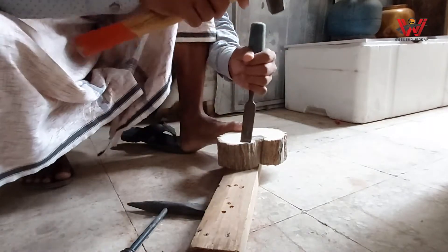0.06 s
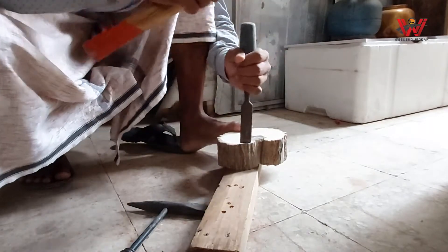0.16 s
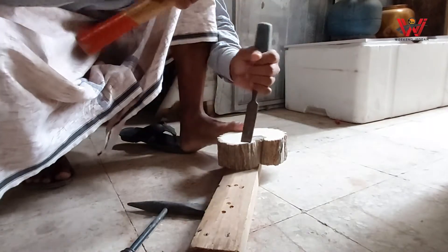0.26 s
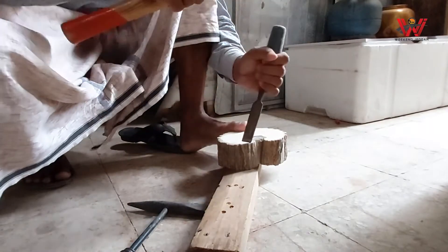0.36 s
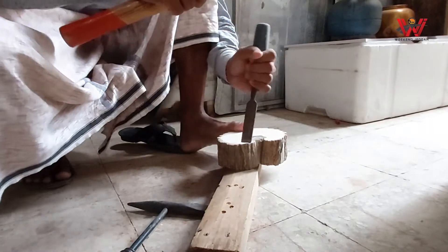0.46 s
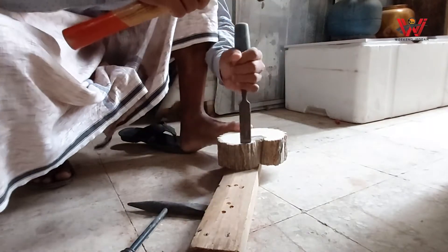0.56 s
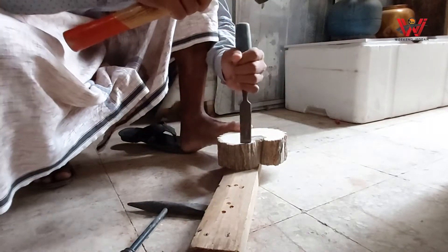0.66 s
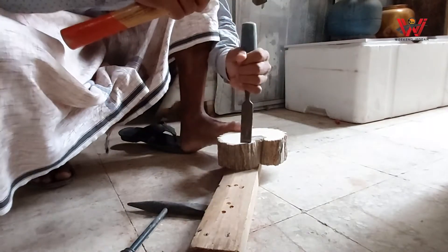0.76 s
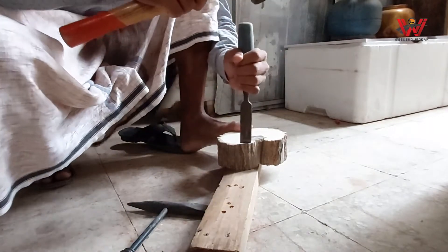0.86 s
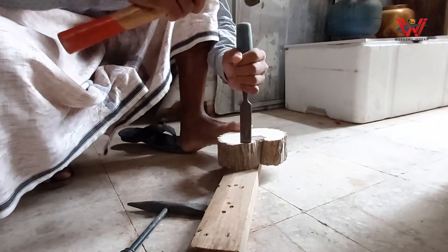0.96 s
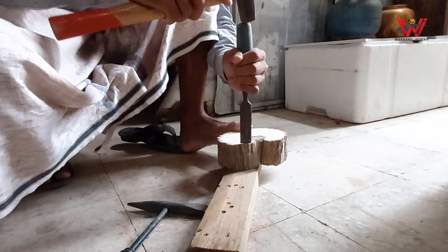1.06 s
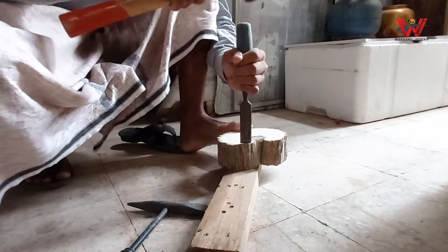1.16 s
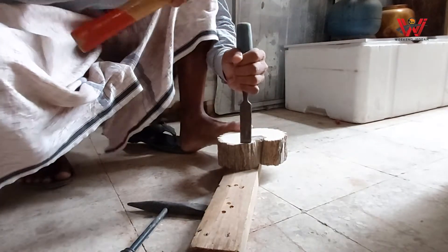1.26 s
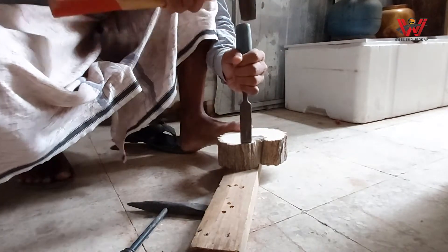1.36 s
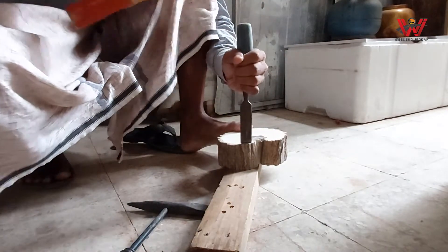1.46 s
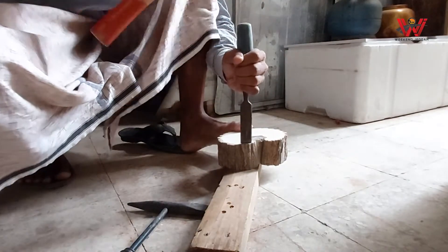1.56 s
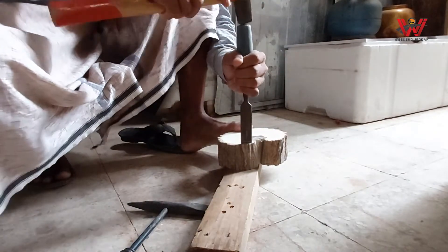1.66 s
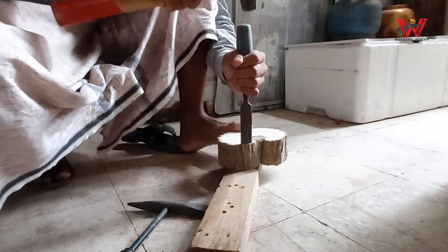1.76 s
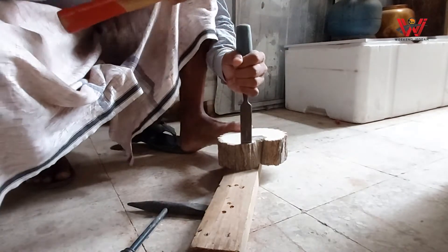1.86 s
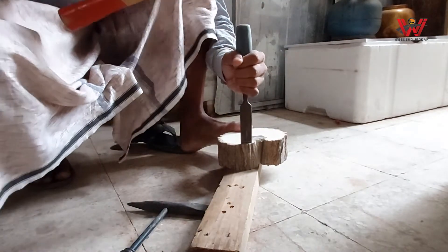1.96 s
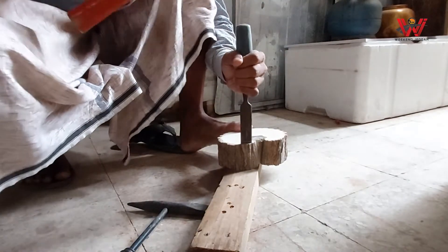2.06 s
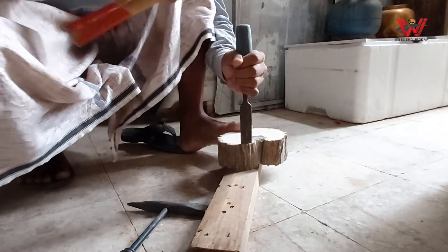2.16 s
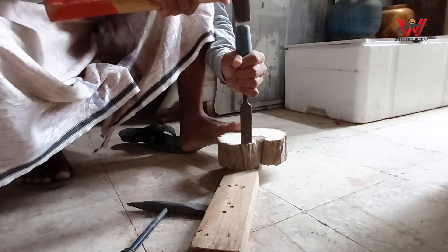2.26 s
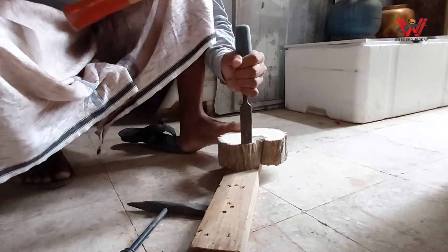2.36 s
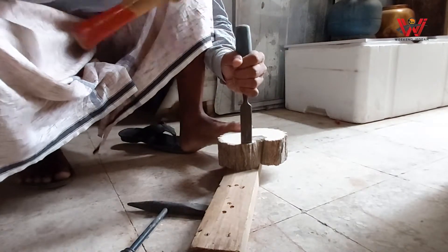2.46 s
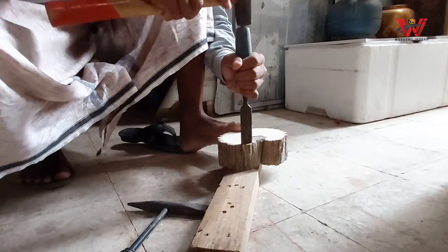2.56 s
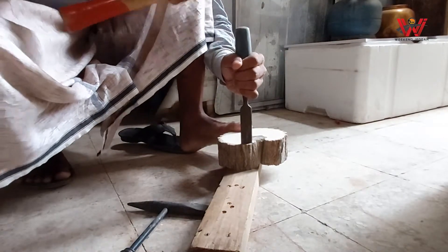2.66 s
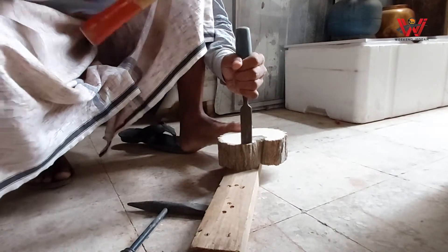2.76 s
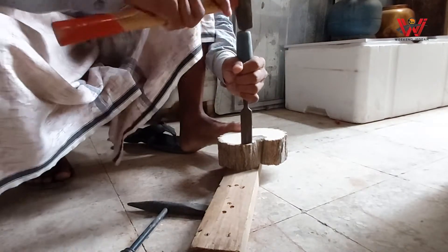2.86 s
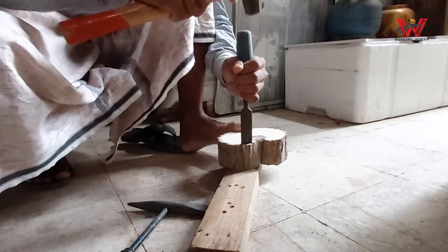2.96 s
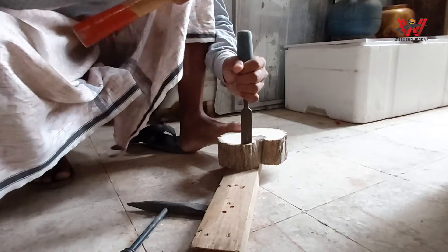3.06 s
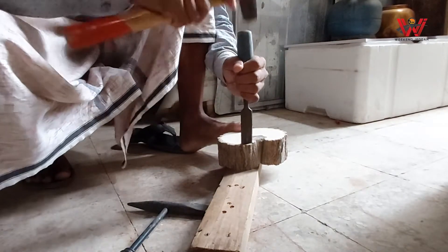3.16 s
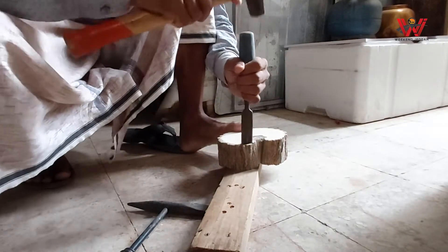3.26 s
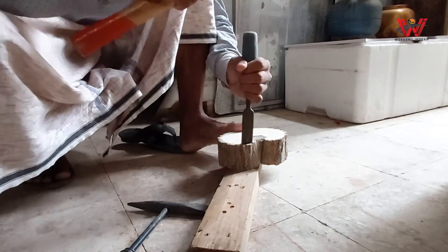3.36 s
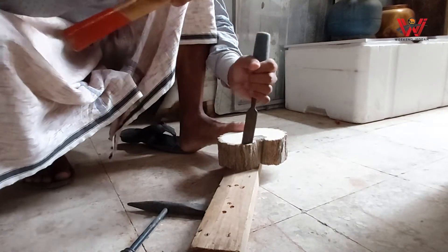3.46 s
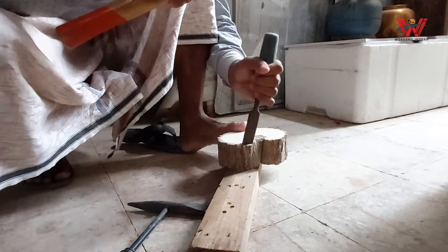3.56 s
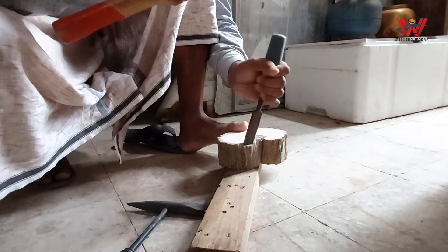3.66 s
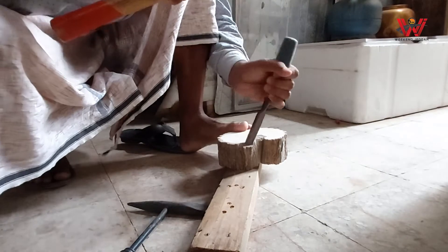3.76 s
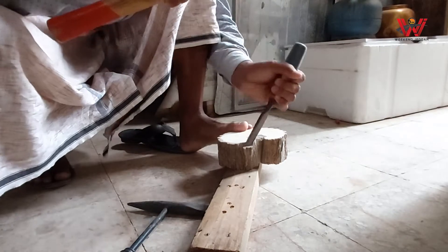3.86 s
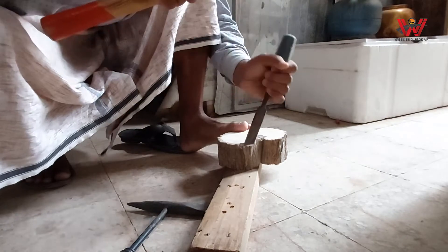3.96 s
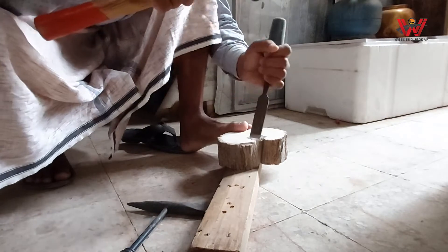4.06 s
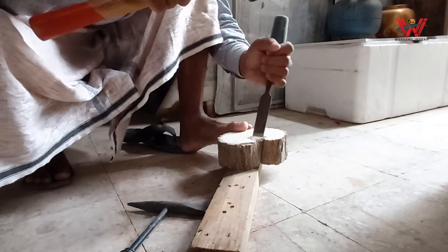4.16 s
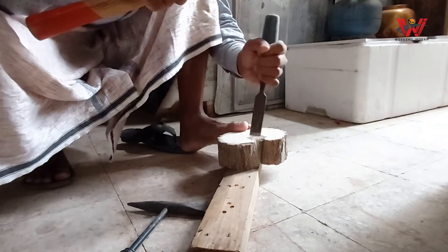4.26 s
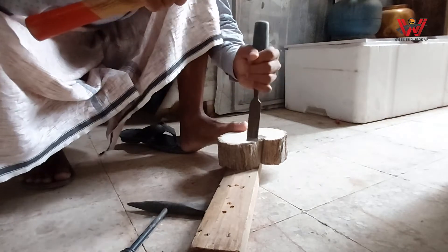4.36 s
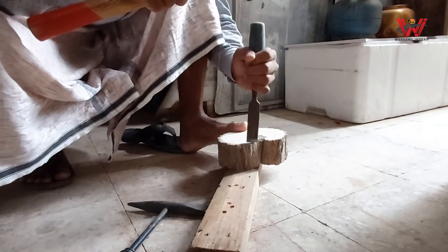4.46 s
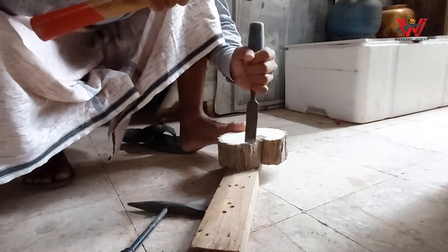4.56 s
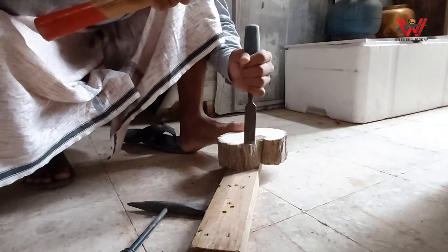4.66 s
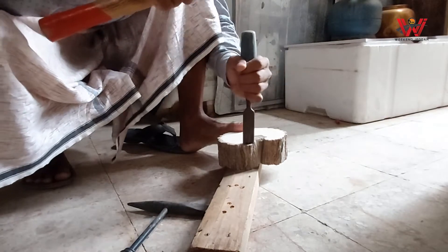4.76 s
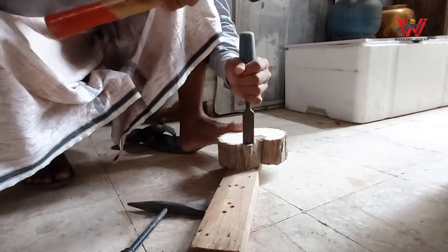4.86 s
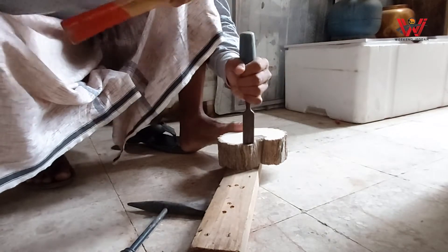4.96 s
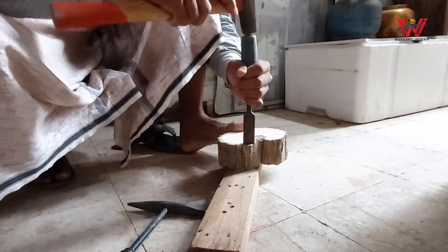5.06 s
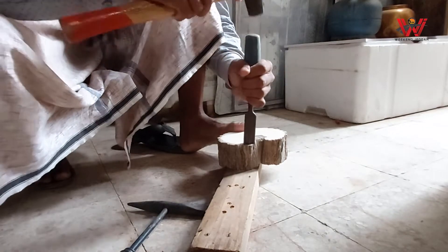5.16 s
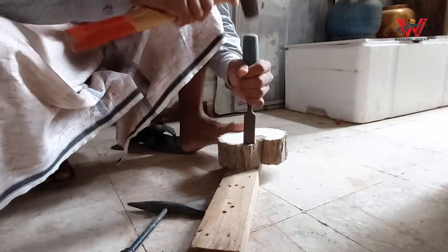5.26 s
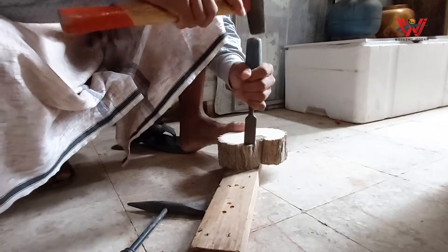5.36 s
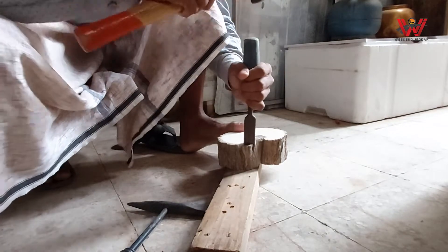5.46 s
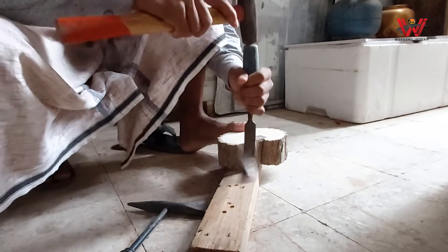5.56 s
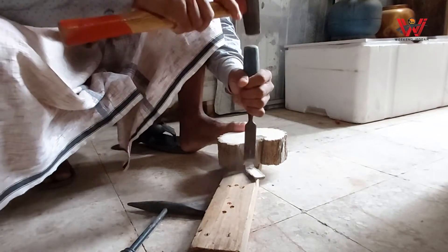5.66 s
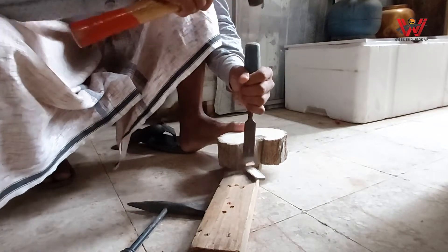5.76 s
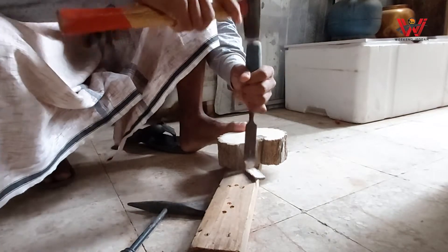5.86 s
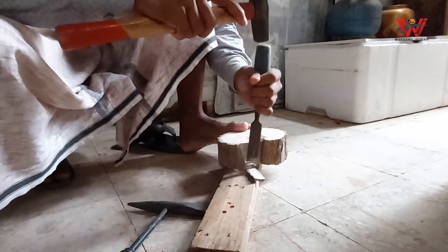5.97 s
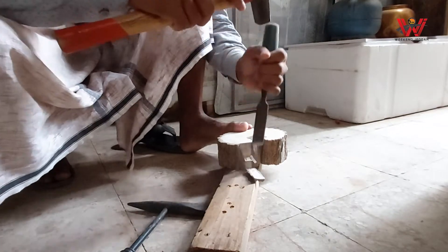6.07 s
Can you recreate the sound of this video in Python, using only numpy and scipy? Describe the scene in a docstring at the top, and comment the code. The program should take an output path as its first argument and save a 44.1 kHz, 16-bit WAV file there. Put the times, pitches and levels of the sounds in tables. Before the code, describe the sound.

A small bare room with a tiled floor, heard close up, with soft low rumble and a wavering hum throughout. A barely audible blade rub opens it, then a faint high chirp near 0.3 s. At 1.1 s the log is nudged with a dull thud. Loud hammer blows on a chisel land at 1.4, 1.7, 2.3, 2.55 and 2.9 s, with a much weaker one at 3.2: hard steel clacks, woody knocks on the tiles, half-second room echo. The second is lower, with a clear metallic ring. From 3.5 to 4.0 s the blade is levered, giving crisp splinter snaps and faint rubs; a soft bump comes at 4.4 and a scrape at 4.8. Blows resume at 5.1, 5.3, 5.6 and 5.9 s, drier and brighter, with duller, crunchier tearing, a sharp snap at 5.6 and a light log clatter at the end.

```python
"""Hammer and chisel on a log in a bare room

A hammer drives a chisel into a slice of log on a tiled floor: each blow is a hard clack of steel resonances
plus a noisy crunch of fibres; a few ms later the log's modes knock on the tiles and the room rings.
Solid wood passes the blow on to floor and room; the more it gives, the drier and brighter the steel clack,
and the louder (against the blow) and duller the tearing crunch.
Between two runs of blows the blade is levered out with small cracks and rubs of filtered noise.
Behind it: band-noise ambience, a low hum of wavering sines and one faint chirp."""
import sys
import numpy as np
from scipy import signal
from scipy.io import wavfile

SR = 44100
rng = np.random.default_rng(int(sys.argv[2]) if len(sys.argv) > 2 else 0)


def dump(signal):
    """Clip the signal to [-1, 1] and save it as 16-bit WAV at the path in sys.argv[1]."""
    limited = np.clip(np.atleast_2d(signal).T, -1, 1)
    pcm = np.round(limited * 32767).astype(np.int16)
    wavfile.write(sys.argv[1], SR, pcm)


N = 269627
TIME = np.arange(N) / SR
CONTACT_TIME = TIME[:SR // 20]   # s since a contact

# hammer on chisel: (time [s], strength [dB], give of the wood [0-1], looseness of the blade [0-1],
# log's knock on the tiles [dB], knock delay [s])
BLOWS = [(1.366, 24.5, 0, 0.26, 24, .003), (1.6972, 26, 0.02, 0.72, 25.5, 0.0019),
         (2.2554, 22, 0.52, 0.3, 25.5, 0.0015), (2.5506, 26.5, 0.49, 0.06, 23, .0017),
         (2.8851, 24.5, 0.55, 0, 17.5, .0027), (3.2254, 12.5, 0.87, 0.26, 16.5, 0.0035),
         (5.101, 22, 0.72, 0, 14, .0044), (5.3326, 25, 1, 0.05, 20.5, .0029),
         (5.599, 24, 0.81, 0, 20, 0.0056), (5.9174, 20.5, 0.78, 0.18, 14, 0.013)]
# resonances of tearing fibres: (frequency [Hz], width [Hz], level [dB], left minus right [dB])
FIBRE_MODES = [(5330, 1390, -13, 7), (7000, 1300, -7.5, 3.8), (10000, 4400, -9.5, 0.3), (14200, 930, -8, 1)]
CLACK_ROOM_DB = (1.5, -8.5)   # (solid wood, wood that splits freely)


def from_db(db):
    """Decibels to gain."""
    return 10 ** (np.asarray(db) / 20)


def rms_one(x):
    """Scale to rms 1."""
    return x / np.sqrt(np.mean(x ** 2) + 1e-20)


def between(ends, share):
    """The value a share of the way from the first end to the second."""
    return ends[0] + (ends[1] - ends[0]) * np.clip(share, 0, 1)


def at_hz(points, hz):
    """Read a table on a log-frequency axis."""
    freqs, values = np.transpose(points)
    return np.interp(np.log(hz), np.log(freqs), values)


def add(track, s, sound):
    """Mix a sound into the track at time s."""
    start = int(round(s * SR))
    part = sound[..., :N - start]
    track[..., start:start + part.shape[-1]] += part


def drift(knots_per_s):
    """Random wander: straight lines between normal knots of spread 1."""
    knots = rng.standard_normal(N // 20)
    return np.interp(TIME * knots_per_s, np.arange(len(knots)), knots)


def stereo_noise(alike, size):
    """White noise whose two sides share the given likeness."""
    mid, side = rng.standard_normal((2, size))
    alike = np.clip(alike, -1, 1)
    common = np.sqrt(1 + alike) * mid
    opposed = np.sqrt(1 - alike) * side * [[1], [-1]]
    return (common + opposed) / np.sqrt(2)


def noise_bands(likeness, size):
    """Half-octave bands of stereo noise, each with its centre frequency."""
    edges_hz = 25 * 2 ** (np.arange(20) / 2)
    for low, high in zip(edges_hz, edges_hz[1:]):
        hz = np.sqrt(low * high)
        band = signal.butter(3, [low, high], "band", fs=SR, output="sos")
        yield hz, signal.sosfilt(band, stereo_noise(at_hz(likeness, hz), size))


def resonate(drive, modes, tilt_db, pivot_hz, alternate=True):
    """Parallel resonances, each with its own direction, tilted in dB per octave about the pivot."""
    out = 0
    slope = signal.lfilter([1, 0, -1], [1], drive) + 1e-18   # a steady push gives no sound
    for k, (hz, width_hz, db, pan_db) in enumerate(modes):
        r = np.exp(-np.pi * width_hz / SR)
        sides = from_db(np.array([[.5], [-.5]]) * pan_db)
        sign = (-1) ** k if alternate else 1
        gain = sign * from_db(db + tilt_db * np.log2(hz / pivot_hz)) * (1 - r * r) / 2
        poles = [1, -2 * r * np.cos(2 * np.pi * hz / SR), r * r]
        out = out + sides * gain * signal.lfilter([1], poles, slope)
    return out


def retuned(modes, semitones):
    """The same resonances, shifted in pitch."""
    ratio = 2 ** (semitones / 12)
    return [(hz * ratio, *rest) for hz, *rest in modes]


def contact(grit_db, grit_s, alike, room_db):
    """A sharp push and a dying spray of tiny contacts, as (direct, into the room); the room averages the spray out."""
    grit = stereo_noise(alike, len(CONTACT_TIME)) * np.exp(-CONTACT_TIME / grit_s)
    grit = rms_one(grit) / np.sqrt(len(CONTACT_TIME))
    push = np.zeros((2, len(CONTACT_TIME)))
    push[:, :2] = np.eye(2)   # reaches the left side one sample before the right
    spray = from_db(grit_db)
    direct = push + spray * grit
    to_room = push * from_db(room_db) * np.hypot(1, spray)
    return np.array([direct, to_room])


def background(flutter_db=1.5, waver=.03):
    """Low rumble and faint hiss from noise bands, with a hum of wavering sines."""
    # (frequency [Hz], level per Hz [dB])
    ambience_colour = [(30, -12.5), (55, -8), (110, -8), (200, -19.5), (300, -16), (430, -25), (750, -30.5),
                       (1050, -25.5), (1600, -36.5), (2500, -49), (5000, -57), (9000, -58.5), (15000, -57)]
    # (frequency [Hz], left-right likeness)
    ambience_likeness = [(60, 0.94), (300, 0.76), (1000, 0), (3000, 0.095), (10000, 0.073)]
    # (time [s], level [dB])
    ambience_level = [(0, -46), (.9, -46), (2, -49.5), (3.2, -49.5), (4.9, -45.5), (6.1, -45)]
    # hum: (mean frequency [Hz], level [dB])
    hum_tones = [(57, -57.5), (114, -55.5), (174, -67.5), (234, -64.5)]
    rumble = 0
    for hz, band in noise_bands(ambience_likeness, N):
        rumble = rumble + band * from_db(at_hz(ambience_colour, hz) + flutter_db * drift(10))
    hum = 0
    for hz, db in hum_tones:
        wavering_hz = hz * (1 + waver * drift(7.9))
        hum = hum + from_db(db) * rms_one(np.sin(2 * np.pi * np.cumsum(wavering_hz) / SR))
    return from_db(np.interp(TIME, *np.transpose(ambience_level))) * rms_one(rumble) + hum


def blade_rubs(grain_db=4, room_db=-5):
    """Steel drags over torn fibres in short grainy swells."""
    # blade rubbing in the cut: (middle [s], half length [s], level [dB], tilt [dB per octave])
    rub_swells = [(0.097, 0.13, -66.5, 3.5), (3.605, 0.042, -64, -16.5), (3.829, 0.039, -68.5, 3),
                  (4.029, 0.021, -54, -9.5), (4.799, 0.029, -54, -0.5)]
    grains = stereo_noise(.4, N) * from_db(grain_db * drift(150))
    for s, half_s, db, tilt_db in rub_swells:
        near = np.abs(TIME - s) < 2 * half_s
        hiss = rms_one(resonate(grains[:, near], FIBRE_MODES, tilt_db, pivot_hz=8000))
        swell = from_db(db) * hiss * np.exp(-((TIME[near] - s) / half_s) ** 2)
        yield TIME[near][0], np.array([swell, swell * from_db(room_db)])


def room_echo(build_s=0.018, lumpy_db=0.5, lumps_per_s=350):
    """Reflections between tiles and bare walls build up fast, clump and die band by band; a few resonances stand out."""
    # (frequency [Hz], level [dB])
    room_colour = [(60, -3.5), (150, 2.5), (300, 0.5), (550, -2.5), (900, 0.5), (1500, 0.5), (2500, 0),
                   (3600, 3.5), (5500, 4.5), (8000, 3.5), (15000, 4.5)]
    # (frequency [Hz], t60 [s])
    room_t60 = [(150, 0.27), (400, 0.53), (1000, 0.44), (2700, 0.52), (7300, 0.46), (15000, 0.34)]
    # (frequency [Hz], left-right likeness)
    room_likeness = [(100, 0.93), (300, 0.17), (700, .55), (1500, 0), (3000, 0.0094), (10000, 0)]
    # narrow resonances: (frequency [Hz], width [Hz], level [dB], left minus right [dB])
    room_modes = [(229, 12, -1, 0), (730, 22, 0.5, -4.5), (860, 21, 1.5, 0), (982, 21, -8.5, -5.5),
                  (1164, 28, -5.5, -6), (1324, 6.6, 0.5, 1.7), (1810, 17, -1.5, -1), (2701, 52, -3.5, -1),
                  (3290, 16, -11.5, -3.5), (4170, 57, 1, -2)]
    t = TIME[:SR * 2 // 3]
    echo = 0
    for hz, band in noise_bands(room_likeness, len(t)):
        fall_per_s = np.log(1000) / at_hz(room_t60, hz)
        decay = np.exp(-fall_per_s * t) * np.sqrt(2 * fall_per_s / SR)
        echo = echo + band * from_db(at_hz(room_colour, hz)) * decay
    clumps = rms_one(from_db(lumpy_db * drift(lumps_per_s)[:len(t)]))
    echo = echo * clumps * (1 - np.exp(-(t / build_s) ** 2))
    standing_out = resonate(echo, room_modes, tilt_db=1.5, pivot_hz=1000, alternate=False)
    return from_db(-1.5) * (echo + standing_out)


def in_room(sound):
    """The echo of a sound from its own spot in the room."""
    return signal.oaconvolve(sound, room_echo(), axes=1)[:, :N]


def chirp():
    """A faint high chirp, a sine that drops and turns hoarse through random pitch waver."""
    start_s, attack_s, level_db, fade_db_per_s = .28, 0.065, -56.5, 81.5
    ends_hz, drop_after_s, drop_s, waver = (5650, 4650), .085, 0.014, 0.16
    t = np.maximum(TIME - start_s, 0)
    dropped = (1 + np.tanh((t - drop_after_s) / drop_s)) / 2
    hz = between(ends_hz, dropped) * (1 + waver * dropped * drift(2500))
    attack = np.minimum(t / attack_s, 1) ** 2
    envelope = attack * from_db(level_db - fade_db_per_s * np.maximum(t - attack_s, 0))
    return envelope * np.sin(2 * np.pi * np.cumsum(hz) / SR)[None]


def knock(db, tilt_db, semitones, sharp_hz, thump_db, room_db):
    """The log slaps the tiles and chatters briefly; the floor thumps under it."""
    # log before retuning: (frequency [Hz], width [Hz], level [dB], left minus right [dB])
    log_modes = [(271, 140, -2.5, -1), (450, 180, -9, -2.5), (729, 350, -2, 2), (987, 170, -6.5, -5),
                 (1234, 200, -2.5, -3.5), (1386, 110, -8.5, -2), (2090, 240, -5, 4), (2490, 100, -13, -2)]
    # floor: (frequency [Hz], width [Hz], level [dB], left minus right [dB])
    floor_modes = [(113, 17, -6, 0.079), (162, 130, -1.5, -4)]
    push = contact(grit_db=-2.5, grit_s=0.0076, alike=0.64, room_db=room_db)
    softness = signal.butter(4, sharp_hz, fs=SR, output="sos")
    push = signal.sosfilt(softness, push + 1e-18)
    slap = resonate(push, retuned(log_modes, semitones), tilt_db, pivot_hz=710, alternate=False)
    thump = resonate(push, floor_modes, tilt_db=1, pivot_hz=130, alternate=False)
    return from_db(db) * slap + from_db(thump_db) * thump


def log_knocks():
    """Every blow drives the log against the floor; now and then it is nudged or drops back on its own."""
    # (time [s], strength [dB], pitch shift [semitones], contact sharpness [Hz], floor thump [dB])
    nudges = [(1.12, 2.5, -7, 1108, 12), (4.434, 3.5, -1, 517, -12), (5.9355, 14, 4, 5150, -22)]
    nudge_tilt_db, nudge_room_db = -3, -4   # tilt per octave
    for s, db, semitones, sharp_hz, thump_db in nudges:
        yield s, knock(db, nudge_tilt_db, semitones, sharp_hz, thump_db, nudge_room_db)
    # (solid wood, wood that splits freely); tilt per octave, thump relative to the knock
    knock_tilt_db, knock_semitones = (3, -3), (-0.42, 0.13)
    knock_room_db, relative_thump_db = (1.5, -4.5), (4, -6)
    thump_loss_db_per_s = 1199.5   # a log that lands late has lost its weight
    # harder knocks are brighter
    reference_sharp_hz, reference_db, sharper_octaves_per_db = 3330, 26.5, .03
    for s, _, give, _, db, delay_s in BLOWS:
        sharp_hz = reference_sharp_hz * 2 ** (sharper_octaves_per_db * (db - reference_db))
        thump_db = db + between(relative_thump_db, give) - thump_loss_db_per_s * delay_s
        tilt_db, semitones = between(knock_tilt_db, give), between(knock_semitones, give)
        yield s + delay_s, knock(db, tilt_db, semitones, sharp_hz, thump_db, between(knock_room_db, give))


def fibre_snaps(low_edge_hz=4000, room_db=-9, count=6):
    """Splinters break with thin, bright ticks; they are too small to give out anything low."""
    # clearest splinters: (time [s], strength [dB], tilt [dB per octave])
    clear_snaps = [(1.12, -26, -4), (3.5409, 4.5, -3.5), (3.5653, -5, -6), (3.645, -9, 5), (3.738, -16, 9),
                   (3.7823, -12.5, 4), (4.435, -23, -3), (4.7315, -26, 8), (4.8183, -16, -5.5),
                   (5.603, 17.5, -4.5)]
    # smaller fibres go at random while the blade is levered
    lever_span_s, lever_db, lever_spread_db = (3.8, 3.9), -29, 7
    small = signal.butter(4, low_edge_hz, "high", fs=SR, output="sos")
    levered = []
    for _ in range(count):
        levered.append((between(lever_span_s, rng.random()), rng.normal(lever_db, lever_spread_db), 0))
    for s, db, tilt_db in [*clear_snaps, *levered]:
        push = contact(grit_db=-4, grit_s=.0018, alike=.2, room_db=room_db)
        tick = resonate(push, FIBRE_MODES, tilt_db, pivot_hz=8000)
        yield s, from_db(db) * signal.sosfilt(small, tick)


def hammer_blows(push_db=3):
    """The hammer clacks on the chisel: a hard spike with little grit, its pitch set by how the blade is seated."""
    # chisel before retuning: (frequency [Hz], width [Hz], level [dB], left minus right [dB])
    chisel_modes = [(1430, 1077, -7, 2.5), (1960, 762, -0.5, 1), (2656, 410, -2.5, 2),
                    (4030, 800, -17.5, 4.5), (4800, 880, -19.5, 8.5), (8070, 2400, -21, -1),
                    (9600, 3900, -34, -5.5), (13980, 3000, -35, 1)]
    # (solid wood, wood that splits freely); tilt per octave
    clack_tilt_db, clack_semitones = (-3, 0.5), (-.4, 0.78)
    loose_semitones = (0, -6.5)   # (gripped, loose)
    for s, db, give, loose, _, _ in BLOWS:
        push = contact(grit_db=-6, grit_s=.004, alike=.7, room_db=between(CLACK_ROOM_DB, give))
        modes = retuned(chisel_modes, between(clack_semitones, give) + between(loose_semitones, loose))
        clack = resonate(push, modes, between(clack_tilt_db, give), pivot_hz=2180)
        yield s, -from_db(db + push_db) * clack


def blade_rings(room_db=-3, damping_db_per_s=90):
    """Steel sings on in a close pair of bending modes, most when held loosely; hand and wood damp it."""
    # (frequency [Hz], width before damping [Hz], level [dB], left minus right [dB])
    blade_modes = [(2690, 1.7, 1, 0), (2661, 6, -3.5, 4)]
    ring_db = (-8.5, 12)   # relative to the blow: (gripped, loose)
    for s, db, _, loose, _, _ in BLOWS:
        envelope = from_db(db + between(ring_db, loose) - damping_db_per_s * TIME[:SR])
        ring = envelope * resonate(signal.unit_impulse(SR), blade_modes, tilt_db=-0.5, pivot_hz=2600)
        yield s, np.array([ring, ring * from_db(room_db)])


def wood_splits(wetter_db=1.5):
    """At each blow the edge tears a burst of fibres, louder against the blow and duller as the wood gives."""
    # tearing wood: (frequency [Hz], width [Hz], level [dB], left minus right [dB])
    split_modes = [(3380, 1500, 2, 0.5), (6100, 3300, -2, 0), (9430, 10000, -0.5, -1),
                   (14500, 2400, -4.5, -0.5)]
    # (solid wood, wood that splits freely); level relative to the blow, tilt per octave
    crack_db, crack_tilt_db = (-23, -17), (-1.5, -5)
    for s, db, give, *_ in BLOWS:
        room_db = between(CLACK_ROOM_DB, give) + wetter_db
        tear = contact(grit_db=19.5, grit_s=0.0054, alike=0.11, room_db=room_db)
        tear = tear / np.linalg.norm(tear[0, 0])   # unit energy in the direct left side
        crack = resonate(tear, split_modes, between(crack_tilt_db, give), pivot_hz=7900)
        yield s, from_db(db + between(crack_db, give)) * crack


def scene(left_db=-1.2, right_db=0.39):
    """Chisel, log and cut are each heard directly and through the room; the chirp only through the room."""
    out = background() + in_room(chirp())
    cut = [*blade_rubs(), *fibre_snaps(), *wood_splits()]
    chisel = [*hammer_blows(), *blade_rings()]
    for spot in (cut, log_knocks(), chisel):
        paths = np.zeros((2, 2, N))   # (direct or to room, side, sample)
        for s, sound in spot:
            add(paths, s, sound)
        direct, to_room = paths
        out = out + direct + in_room(to_room)
    return out * from_db([[left_db], [right_db]])


def record(dry, top=.97, low_cut_hz=36, high_cut_hz=16000):
    """The microphone port lifts a treble band, the loudest peaks overload, the deepest rumble and the top are cut."""
    # (frequency [Hz], width [Hz], level [dB], left minus right [dB])
    port_modes = [(7900, 710, 3, -7.5)]
    lifted = dry + resonate(dry, port_modes, tilt_db=0.5, pivot_hz=8000)
    clipped = lifted / (1 + (lifted / top) ** 4) ** .25
    low_cut = signal.butter(3, low_cut_hz, "high", fs=SR, output="sos")
    high_cut = signal.ellip(10, .1, 70, high_cut_hz, fs=SR, output="sos")
    return signal.sosfilt(high_cut, signal.sosfilt(low_cut, clipped))


dry = scene()
out = record(dry)
dump(out)
```